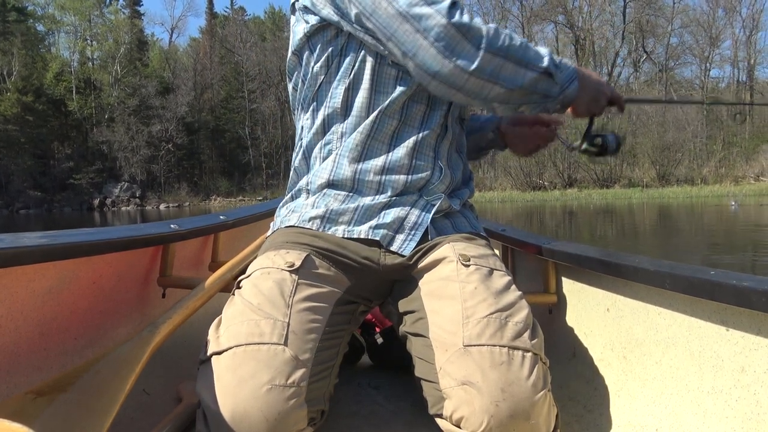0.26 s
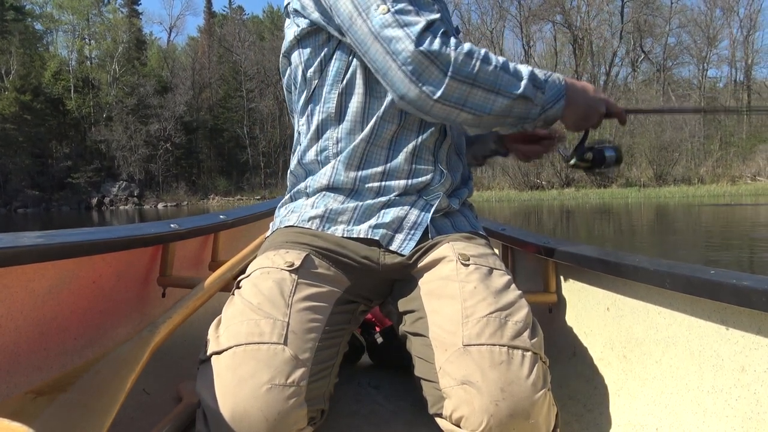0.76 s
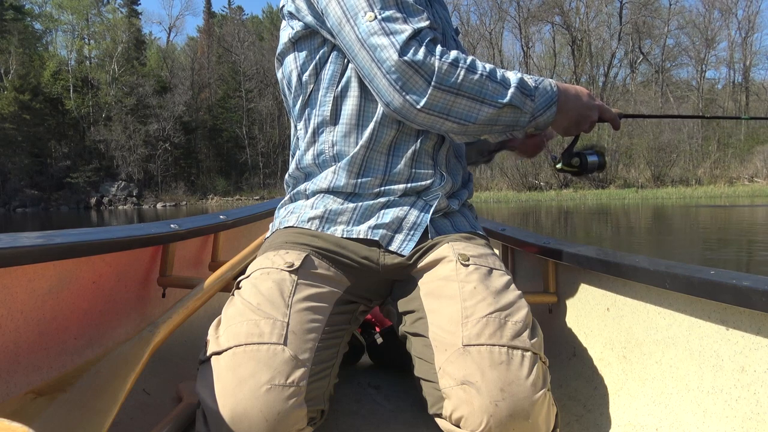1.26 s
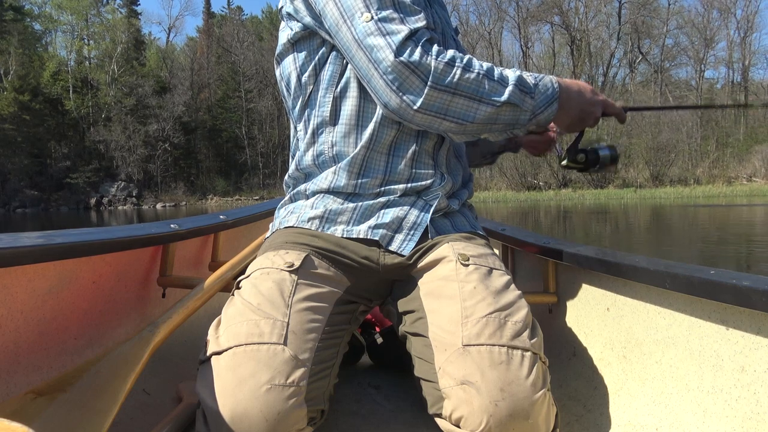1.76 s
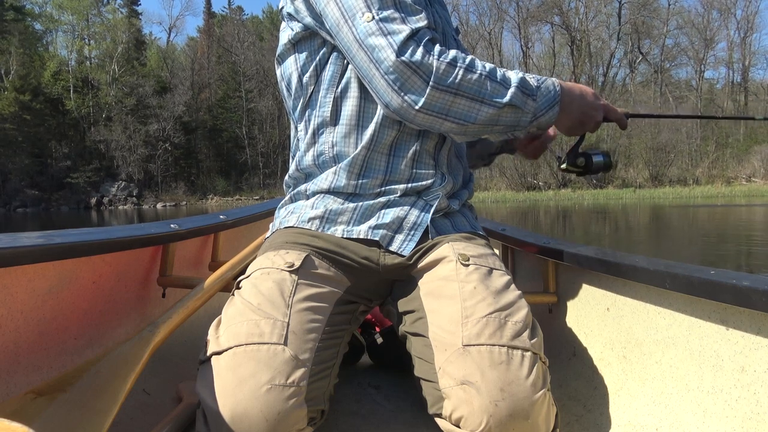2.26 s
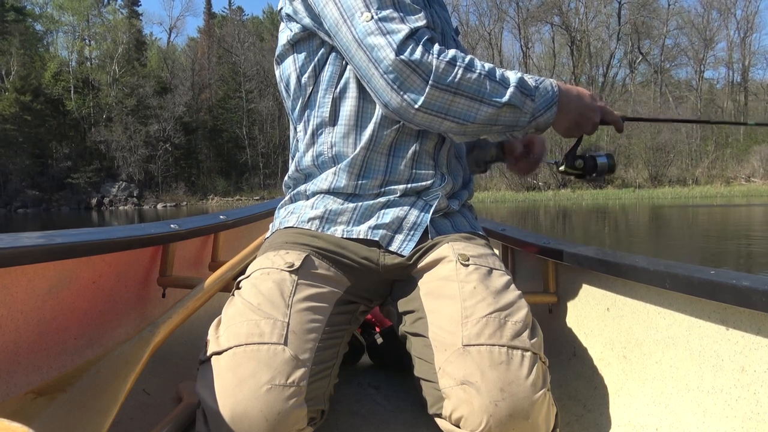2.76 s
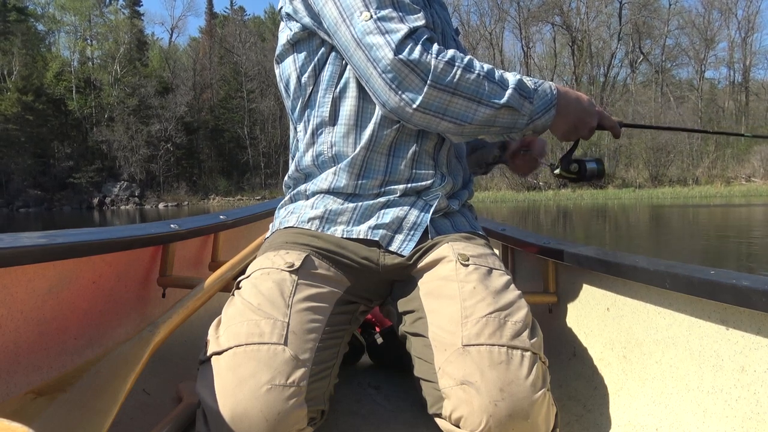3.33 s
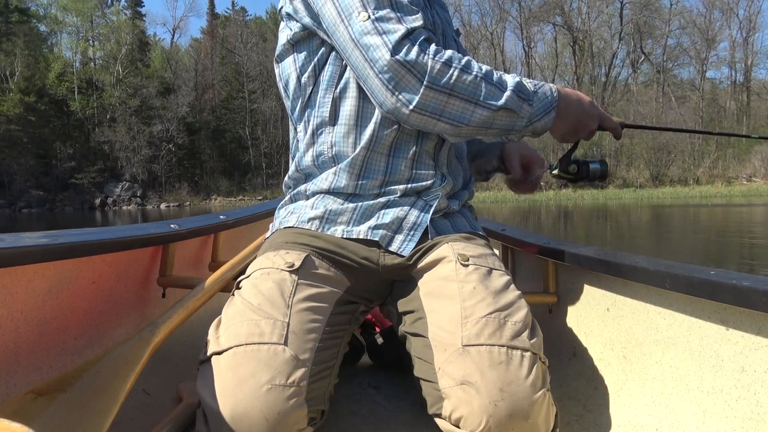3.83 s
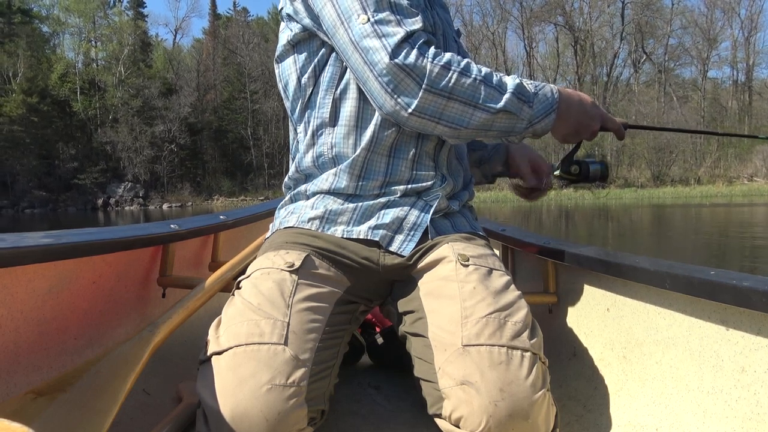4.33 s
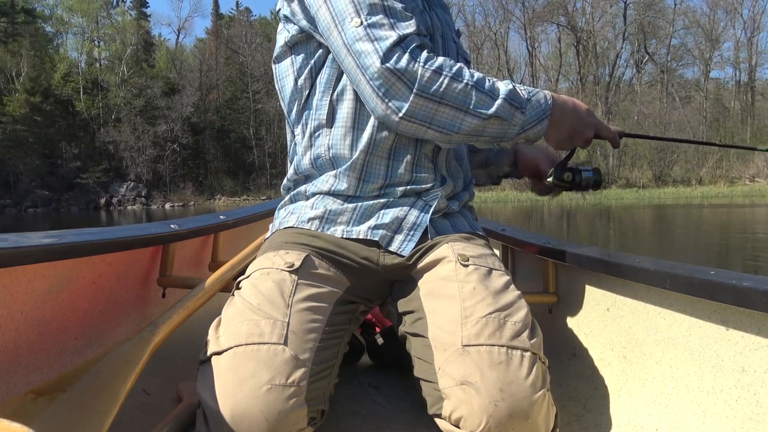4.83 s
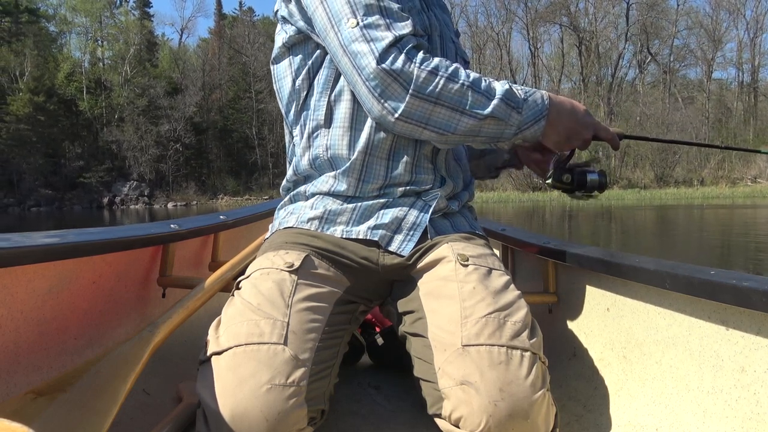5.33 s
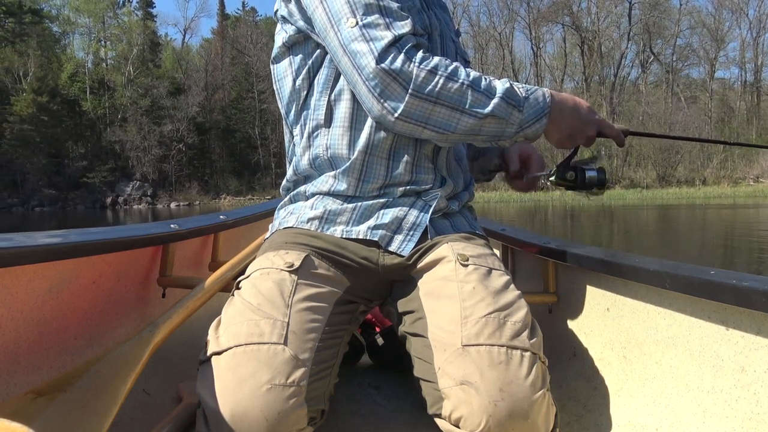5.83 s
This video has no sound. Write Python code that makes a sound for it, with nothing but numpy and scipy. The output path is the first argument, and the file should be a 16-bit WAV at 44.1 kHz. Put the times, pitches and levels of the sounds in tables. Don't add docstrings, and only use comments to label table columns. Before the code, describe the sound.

From 0 s, three toads trill at once, fast purring whistles, two nearly the same pitch and one higher. The high one ends around 0.7 s. Just after a tiny thin line squeak, at 0.26-0.32 s a reel bail snaps shut close by, a hard metallic rattle, then crank ticks, fine droplets and rising, ringing plinks until about 0.7 s; sparse faint ticks continue. A clearly lower trill enters near 0.95 s and lasts to 5.4 s. The first pair stops around 2.2-2.3 s, and a soft hollow hull knock sounds at 2.4 s. Fainter distant trills join, and another near one starts at 2.8 s, running to the end. A dull thump comes at 4.3 s. Distant low and mid trills swell after 5.4 s. Rumbling wind is strongest early and eases; a far engine drone rises from about 4.5 s. Soft air hush and wooded echo throughout, until 6.1 s.

```python
import sys
import numpy as np
from scipy import signal
from scipy.fft import rfft, irfft, next_fast_len
from scipy.io import wavfile
from scipy.ndimage import map_coordinates

SR = 44100
rng = np.random.default_rng(int(sys.argv[2]) if len(sys.argv) > 2 else 0)


def to_wav(s):
    ch = np.atleast_2d(s).T
    pcm = np.round(np.clip(ch, -1, 1) * 32767)
    wavfile.write(sys.argv[1], SR, pcm.astype(np.int16))


def natural_amplitude(level_db):
    exponent = np.asarray(level_db, float) / 20
    return 10 ** exponent


N = 268569
TIME = np.arange(N) / SR


def unit(x):
    return x / np.sqrt(np.mean(x ** 2) + 1e-20)


def along(points, hz):
    f, v = np.transpose(points)
    return np.interp(np.log(hz + 1), np.log(f + 1), v)


def wobble(rate):
    knots = rng.standard_normal(int(N * rate / SR) + 4)
    return map_coordinates(knots, [TIME * rate])


def filtered(x, response):
    m = next_fast_len(N + SR // 2)
    return irfft(rfft(x, m) * response(np.fft.rfftfreq(m, 1 / SR)), m)[:N]


def noise(spectrum):
    return unit(filtered(rng.standard_normal(N), lambda hz: natural_amplitude(along(spectrum, hz))))


def modes(table):
    def response(f):
        total = 0
        for k, (centre, width, db) in enumerate(table):
            band = 1j * f * width / (centre * centre - f * f + 1j * f * width)
            total = total + (-1) ** k * natural_amplitude(db) * band
        return total
    return response


def chorus():
    # swell t/s, level/dB, drift/(dB per s), pitch f/Hz, opening sharpness f/Hz
    mid = (.002, -21, -.3, 1788, 20)
    twin = (.002, -23.5, -.8, 1772, 10)
    high = (.002, -21.5, 0, 1962, 15)
    low = (.098, -19.3, .05, 1481, 5)
    late = (.13, -22.2, .3, 1718, 15)
    distant = (.1, -37.5, 1.9, 1945, 20)
    deep = (.05, -44, 5, 1410, -30)
    last = (.07, -26, 3, 1770, -50)
    shadow = (.2, -30.5, .6, 1445, 20)
    hidden = (.05, -32.5, 1.6, 1775, 15)
    # multiple of the pitch, level/dB
    big_throat = [(2.29, -37), (2.64, -40)]
    near = toad("mid", mid, .52, -28.5, -52, -28)
    near += toad("low", low, .74, -37, -56, -29, big_throat, skew=.7, sag=.008)
    near += toad("late", late, .52, -36.5, -51, -40)
    near += toad("high", high, .45, -27, -48.5, -24, fade_db=12)
    near += toad("twin", twin, .5, -36, -42, -27)
    near += toad("last", last, .65, -63, -52, -46)
    near += toad("far", distant, .42, -27, -40, -20)
    near += toad("hidden", hidden, .5, -31, -38, -18, fade_db=3)
    far = toad("deep", deep, .55, -40, -60, -32)
    far += toad("shadow", shadow, .6, -32, -60, -20)
    return near + far + natural_amplitude(-16) * shore(near) + natural_amplitude(-8) * shore(far)


def toad(name, voice, duty, second_db, third_db, rasp_db, extra=(), skew=.76, sag=.013,
         scatter_db=-.08, fade_db=0):
    pace = { "mid": (.0060, 59.071, -1.772, 4.17, 5.49), "twin": (.0048, 56.706, 0, 2.44, 11.11),
            "high": (.0023, 54.914, 6.943, 0, 0), "low": (.9421, 67.439, 1.918, 2.27, 9.32),
            "late": (2.7597, 64.38, .854, 5.74, 0), "far": (2.2036, 51.836, 0, 10.59, 5.56),
            "deep": (5.439, 66.074, 0, 12.73, 0), "last": (5.854, 64.583, 0, 0, 0),
            "shadow": (1.1501, 70.674, 1.871, 0, 0), "hidden": (2.3064, 66.927, 3.16, 0, 16.56), }
    stop = {"mid": 2.22, "twin": 2.33, "high": .68, "low": 5.41, "late": 6.09, "far": 5.01, "deep": 6.09,
            "last": 6.09, "shadow": 4.44, "hidden": 4.5}
    # multiple of the pitch, level/dB
    throat = [(.7, -36), (0.999, 1), (1.27, -36)]
    # multiple of the pitch, level/(dB per Hz)
    rasp_spectrum = [(0.301, -54.5), (.55, -18), (0.799, -0.5), (1.402, -11.5), (2.001, -12), (2.3, -19.5),
                     (3.2, -27), (3.999, -50.5)]
    overtone = 1.97
    eager_s, brake_s = .5, .2
    first, steady, tiring, rush, brake = pace[name]
    swell_s, db, drift_db, hz, sharp_hz = voice
    end = stop[name]

    s = np.arange(first - .05, end, .001)
    age = s - first
    pulses = steady * age - tiring * age ** 2 / 2
    pulses += rush * eager_s * (1 - np.exp(-age / eager_s))
    pulses -= brake * brake_s * np.exp((s - end) / brake_s)
    centre = np.interp(np.arange(pulses[-1]), pulses, s)
    length = duty * np.gradient(centre)
    age = centre - first

    luck = rng.standard_normal((len(centre), 5))
    start = np.round((centre + .00025 * luck[:, 0] - .45 * length) * SR).astype(int).clip(0)
    t = np.arange(round(.016 * SR)) / SR
    u = np.clip(t / (length * (1 + .045 * luck[:, 1]))[:, None], 0, 1)

    sharp = sharp_hz * np.exp(-age / eager_s)
    effort_db = db + drift_db * age + .07 * sharp
    effort_db -= fade_db * np.exp((centre - end) / brake_s)
    size = natural_amplitude(effort_db + 7 + scatter_db * luck[:, 2]) * (1 - np.exp(-(age + .01) / swell_s)) ** 2
    swell = np.sin(np.pi * u ** skew) ** 1.42 * size[:, None]

    pitch = ((hz + sharp) * (1 + .0029 * luck[:, 3]))[:, None] * (1 + sag * (.2 - u ** 3))
    turn = 2 * np.pi * np.cumsum(pitch, axis=1) / SR + .5 * luck[:, 4:]
    partials = [*throat, (overtone, second_db), (3 * overtone / 2, third_db), *extra]
    tone = sum(natural_amplitude(level) * np.sin(k * turn) for k, level in partials)

    at = (start[:, None] + np.arange(len(t))).ravel()
    gate = np.bincount(at, swell.ravel(), N + SR)[:N]
    call = np.bincount(at, (swell * tone).ravel(), N + SR)[:N]
    rasp = noise(np.array(rasp_spectrum) * [hz, 1])
    return call + natural_amplitude(rasp_db) * gate * rasp


def shore(x):
    # f/Hz, t60/s
    decay = [(800, 0.69), (2000, 0.22), (6000, 0.057)]
    out, step = np.zeros(N + SR), SR // 4
    fade = np.hanning(2 * step)
    padded = np.pad(x, (step, 2 * step))
    for a in range(0, N, step):
        hz, t, z = signal.stft(rng.standard_normal(SR // 3), SR, nperseg=256)
        dying = natural_amplitude(-60 * t / along(decay, hz)[:, None])
        tail = signal.istft(z * dying, SR, nperseg=256)[1]
        wet = signal.fftconvolve(padded[a:a + 2 * step] * fade, tail / np.linalg.norm(tail))
        out[a:][:len(wet)] += wet[:len(out) - a]
    return out[step - 150:][:N]


def reel():
    # t/s, peak level/dB, body level/dB, wire level/dB
    snap = [(.2642, -12, -10, -12), (.2708, -17, 1, -24), (.2772, -24, -6, -3), (.2792, -26, 12, -20),
            (.2815, -20, -2, -16), (.2911, -13, -8, -8), (.295, -24, 8, -16), (.3032, -16, -8, -8),
            (.3062, -21, 5, -20), (.3128, -24, -3, -16)]
    # t/s, peak level/dB, body level/dB
    crank = [(.3404, -30, 2), (.3493, -24, -5), (.357, -28, -5), (.3656, -30.5, 3), (.3952, -29, 9),
             (.4191, -26, -4), (.4555, -35, 4), (.4955, -35, 8), (.5885, -37, 8), (.8072, -41, 6),
             (.8255, -40, 7), (1.0135, -30, 6), (1.1955, -39, 8), (1.4125, -36, -1), (1.880, -38, 10),
             (3.586, -35, 8), (4.181, -37, 10), (5.8505, -42, 9)]
    # t/s, peak level/dB, body level/dB
    pings = [(.185, -40, 5), (.5154, -41, -8), (.5385, -37, 3), (.610, -41, 8), (.6453, -41, 4),
             (1.291, -44, 2.5), (2.982, -43, -3), (3.5865, -44, 0), (4.9295, -48, -6), (5.4345, -38, 8)]
    # f/Hz, width/Hz, level/dB
    slam_metal = [(3980, 1200, -5), (5060, 230, 1.5), (6100, 2600, -4), (8750, 2400, -13.5)]
    # f/Hz, width/Hz, level/dB
    slam_housing = [(550, 750, -12), (1480, 140, 7.5), (2250, 125, 11.5), (3040, 68, -16.5)]
    # f/Hz, width/Hz, level/dB
    tick_metal = [(3900, 900, 0), (5000, 1200, -2), (7500, 2000, -17)]
    # f/Hz, width/Hz, level/dB
    tick_housing = [(2310, 300, -2), (2810, 270, -10)]
    ticks = [(*tick, -32) for tick in crank] + [(*ping, -13) for ping in pings]
    slam = cracks(snap, slam_metal, slam_housing, 13, t60=.011)
    return slam + cracks(ticks, tick_metal, tick_housing, 15, t60=.012)


def cracks(events, ring, housing, housing_db, t60):
    # f/Hz, width/Hz, level/dB
    wire = [(10650, 3600, -4.5), (13600, 1300, -1), (15500, 500, -5)]
    parts, t = np.zeros((3, N + SR)), np.arange(SR // 20) / SR
    decay = natural_amplitude(-60 * t / t60) + .12 * natural_amplitude(-60 * t / .056)
    for s, db, body_db, edge_db in events:
        crack = rng.standard_normal((3, len(t))) * decay
        parts[:, round(s * SR):][:, :len(t)] += natural_amplitude(db + np.array([[0], [edge_db], [body_db]])) * crack
    metal, edge, body = parts[:, :N]
    bright = natural_amplitude(12.5) * filtered(edge, modes(wire))
    dull = natural_amplitude(housing_db) * filtered(body, modes(housing))
    return natural_amplitude(5) * filtered(metal, modes(ring)) + bright + dull


def drops():
    # t/s, peak level/dB, pitch f/Hz
    bubbles = [(.394, -6, 2380), (.494, -16, 2480), (.31, -31, 642), (.375, -37, 546), (.515, -16, 1350),
               (.575, -22, 1090), (.61, -19, 1270), (.635, -35, 670), (.802, -34, 620), (5.05, -37, 430)]
    return soft_rings(bubbles, cycles=44, rise=.07)


def knocks():
    # t/s, peak level/dB, pitch f/Hz
    hull = [(2.400, -17, 660), (2.401, -15, 450), (2.410, -20, 270), (2.420, -25, 170), (4.28, -32.5, 85)]
    return soft_rings(hull, cycles=6, rise=0)


def soft_rings(events, cycles, rise):
    out, t = np.zeros(N + SR), np.arange(SR // 5) / SR
    for s, db, hz in events:
        life = t * hz / cycles
        turn = 2 * np.pi * np.cumsum(hz * (1 + rise * np.minimum(life * 2, 1.5))) / SR
        out[round(s * SR):][:len(t)] += natural_amplitude(db - 60 * life) * (1 - np.exp(-t / .0047)) * np.sin(turn)
    return out[:N]


def spray(count=500):
    # t/s, level/dB
    shaken = [(.3, -42), (.4, -47.5), (.55, -51), (.66, -51), (.9, -55), (1.0, -87)]
    luck = rng.random((count, 3))
    s, hz = .3 + .7 * luck[:, 0], 600 * 9 ** luck[:, 1:2]
    t = np.arange(round(.02 * SR)) / SR
    level_db = np.interp(s, *np.transpose(shaken)) + 9
    size = natural_amplitude(level_db - 2.5 * np.log(luck[:, 2] + .01))[:, None]
    swell = t * hz / 1.9 * np.exp(-t * hz / 2)
    blip = size * swell * np.sin(2 * np.pi * hz * t * (1 + 8 * t))
    at = np.round(s * SR).astype(int)[:, None] + np.arange(len(t))
    return np.bincount(at.ravel(), blip.ravel(), N)[:N]


def squeak():
    # from t/s, to t/s, f/Hz, level/dB
    slip = (.165, .22, 14696, -55)
    begin, end, hz, db = slip
    bump = np.sin(np.pi * np.clip((TIME - begin) / (end - begin), 0, 1))
    return natural_amplitude(db) * bump * np.sin(2 * np.pi * hz * TIME + .8 * wobble(80))


def wind():
    # t/s, level/dB
    gusts = [(0, -25), (.3, -23), (.44, -35), (.59, -29), (1.05, -37), (1.37, -32.5), (2.25, -42),
             (2.45, -39), (3.14, -35), (3.28, -50), (3.4, -41), (3.8, -46), (4.05, -40), (4.35, -40),
             (4.7, -48), (6.09, -50)]
    # f/Hz, level/(dB per Hz)
    buffet = [(12, -8), (25, 1.5), (45, -2), (70, -8), (110, -21), (200, -30), (400, -58.5)]
    lumps = unit(natural_amplitude(2.6 * wobble(8)) * noise(buffet))
    return natural_amplitude(np.interp(TIME, *np.transpose(gusts))) * lumps


def engine():
    # t/s, f/Hz, level/dB
    drone = [(3, 103, -68), (4.8, 106, -48.5), (5.05, 107.3, -44.5), (5.2, 112, -54.5), (5.35, 112, -42.5),
             (6.09, 121, -42.5)]
    s, hz, db = np.transpose(drone)
    turn = 2 * np.pi * np.cumsum(np.interp(TIME, s, hz) + 1.2 * wobble(6)) / SR
    return natural_amplitude(np.interp(TIME, s, db, left=-90) - 1 + 1.1 * wobble(5.5)) * np.sin(turn)


def air():
    # f/Hz, level/(dB per Hz)
    hush = [(40, -17.5), (100, 0.5), (250, -7.5), (700, -14.5), (1500, -3), (2500, -12.5), (4500, -25),
            (8000, -31), (16000, -31.5)]
    return natural_amplitude(-42) * noise(hush)


def scene():
    water = drops() + knocks() + spray() + squeak()
    background = wind() + engine() + air()
    return (chorus() + reel() + water + background)[None]


def band_limit(x):
    return signal.sosfilt(signal.butter(12, 16120, fs=SR, output="sos"), x)


def record(dry):
    mix = filtered(dry[0], lambda hz: hz < 15780)[None]
    return band_limit(mix)


dry = scene()
out = record(dry)
to_wav(out)
```